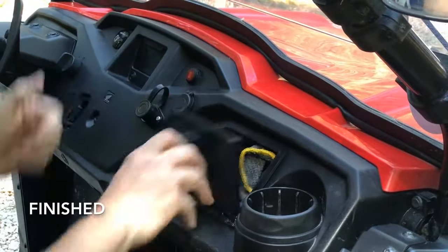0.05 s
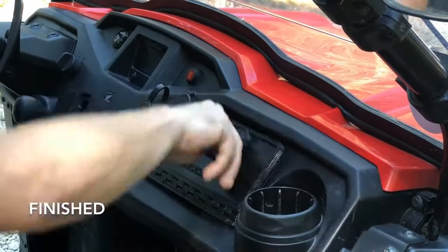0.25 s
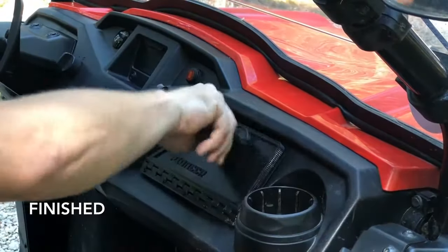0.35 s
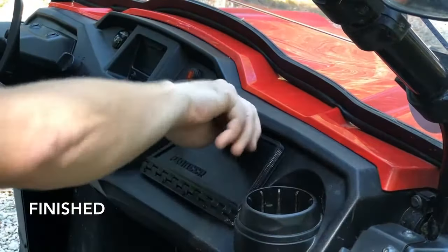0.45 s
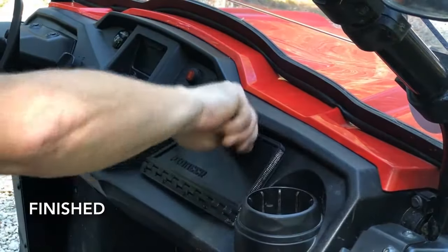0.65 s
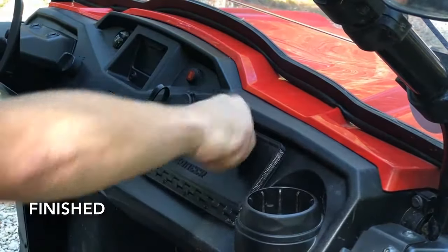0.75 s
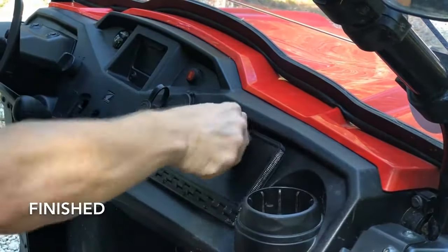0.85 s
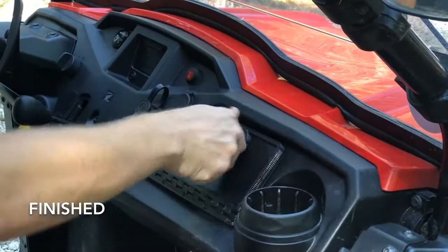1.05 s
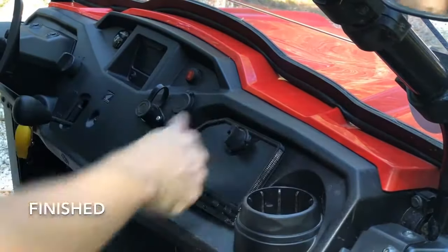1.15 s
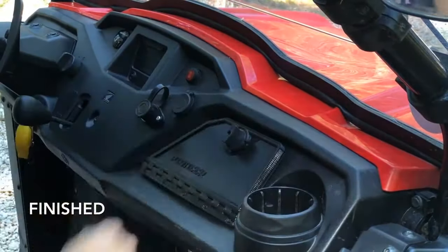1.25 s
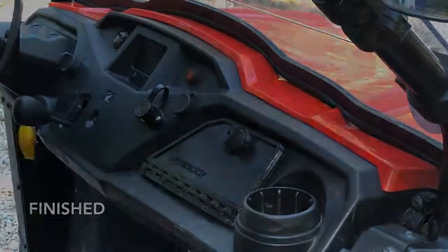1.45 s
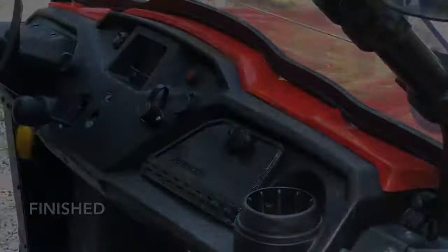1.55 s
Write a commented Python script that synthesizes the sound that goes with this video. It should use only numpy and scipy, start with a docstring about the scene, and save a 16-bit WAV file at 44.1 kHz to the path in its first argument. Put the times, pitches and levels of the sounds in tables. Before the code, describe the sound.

Close by in an open vehicle, a hard plastic lid is swung shut with a loud, rattling clack. Weaker bumps and latch ticks follow as a hand turns the knob, over quiet air and a faint insect hiss.

```python
"""Glove box lid shut outdoors

A hand swings a vehicle's plastic glove box lid shut: the blow rings its modes, a loud clack that
rattles out. Fingers rub and bump the lid and turn its knob, whose latch ticks over its teeth; a last
double knock. Insects hiss in a narrow high band over quiet open air."""
import sys
import numpy as np
from scipy import signal
from scipy.fft import rfft, irfft
from scipy.io import wavfile
from scipy.ndimage import uniform_filter1d

SR = 44100
rng = np.random.default_rng(int(sys.argv[2]) if len(sys.argv) > 2 else 0)


def file_out(sig):
    """Save sig as 16-bit WAV at sys.argv[1]."""
    # one column per channel
    cols = np.atleast_2d(sig).T
    # limit, then scale
    lim = np.clip(cols, -1, 1)
    pcm = np.round(lim * 32767).astype(np.int16)
    wavfile.write(sys.argv[1], SR, pcm)


N = 70560
BEND_DELAY_S = 0.003757  # bending waves at 1 kHz; lower ones arrive later


def undb(db):
    """dB to gain."""
    return 10 ** (np.asarray(db) / 20)


def log_interp(table, hz, col=1):
    """Table column on a log-frequency axis."""
    table = np.array(table)
    return np.interp(np.log(hz), np.log(table[:, 0]), table[:, col])


def fader(table, col=1):
    """Gain over time from a dB column."""
    table = np.array(table)
    return undb(np.interp(np.arange(N) / SR, table[:, 0], table[:, col]))


def shaped_noise(gain):
    """Unit-rms noise with spectrum gain(hz)."""
    hz = np.maximum(np.fft.rfftfreq(N, 1 / SR), 1)
    noise = irfft(rfft(rng.standard_normal(N)) * gain(hz), N)
    return noise / np.sqrt(np.mean(noise ** 2))


def table_noise(table):
    """Unit-rms noise from (f/Hz, level/dB) rows, silent outside them."""
    return shaped_noise(lambda hz: undb(log_interp(table, hz)) * (hz > table[0][0]) * (hz < table[-1][0]))


def wander(rate_hz):
    """Slewed random steps, spread near 1."""
    hold = int(SR / rate_hz)
    return uniform_filter1d(np.repeat(rng.standard_normal(N // hold + 1), hold), hold)[:N]


def burst(t, rise_s, t60_s):
    """Rise from t = 0, exponential decay."""
    t = np.maximum(t, 0)
    return (1 - np.exp(-t / rise_s)) * 10 ** (-3 * t / np.maximum(t60_s, .002))


def open_air():
    """Steady quiet air, a faint treble hiss and a narrow whirr."""
    air_spectrum = [(18, -42), (30, -1), (547, -8), (712, -19.5), (1380, -17.5), (3470, -18), (8300, -30.5),
                    (9470, -45), (15200, -37), (16500, -30)]  # f/Hz, level/dB
    hiss_level = [(0.0, -70), (0.128, -67), (0.284, -64.5), (0.614, -73), (1.01, -72), (1.14, -72.5),
                  (1.6, -92)]  # t/s, level/dB
    whirr_peaks = [(1240, 55, 0), (1370, 62, -0.5)]  # f/Hz, width/Hz, level/dB
    whirr_level = [(0, -80), (.4, -69.5), (.75, -71.5), (1, -70), (1.3, -74), (1.6, -81)]  # t/s, level/dB
    hiss = shaped_noise(lambda hz: (hz > 4000) * (hz / 10000) ** -.3)
    whirr = shaped_noise(lambda hz: np.sqrt(sum(
        undb(2 * db) / (1 + ((hz - f) / (width / 2)) ** 2) ** 2 for f, width, db in whirr_peaks)))
    air = undb(-67.5) * table_noise(air_spectrum)
    return air + fader(hiss_level) * hiss + fader(whirr_level) * whirr


def insects():
    """Throbbing hiss, mainly 7-9 kHz."""
    spectrum = [(3820, -30), (6500, -16), (6760, -16), (6990, -5.5), (7410, -2), (8410, -1), (8870, -9.5),
                (9010, -33), (9200, -27), (12000, -48), (20200, -120)]  # f/Hz, level/dB
    level = [(0, -68.5), (.5, -67.5), (1, -68.5), (1.3, -72.5), (1.6, -77.5)]  # t/s, level/dB
    throb = undb(1.8 * wander(50))
    return fader(level) * throb * table_noise(spectrum)


def hand_rub():
    """Skin drags and bumps unevenly over plastic."""
    levels = [(0, -60, -70.5), (.07, -66, -68), (.13, -53.5, -62), (.2, -55, -48.5), (.3, -42.5, -52.5),
              (.38, -56, -60), (.5, -62.5, -62.5), (.63, -58, -65), (.75, -64, -67), (.9, -57, -61),
              (1.02, -65, -65.5), (1.2, -62.5, -67), (1.3, -75, -69), (1.44, -81, -73.5), (1.6, -67.5, -76)]  # t/s, lows/dB, mids/dB
    low_spectrum = [(18, -29), (30, -7), (70, 3), (140, -2.5), (259, -7.5), (291, -6.5), (500, -19.5),
                    (650, -46), (1100, -120)]  # f/Hz, level/dB
    mid_spectrum = [(240, -28), (400, -3.5), (616, -3), (821, -3.5), (1230, -7), (1420, -10.5),
                    (2690, -16.5), (3940, -19), (7000, -34), (9100, -68), (15400, -120)]  # f/Hz, level/dB
    lows = fader(levels, col=1) * table_noise(low_spectrum) * undb(2.3 * wander(24.6))
    mids = fader(levels, col=2) * table_noise(mid_spectrum)
    return lows + mids * undb(1.37 * wander(40.4) + 2.8 * wander(300))


def knob_response():
    """Knob modes after one tap, unit energy."""
    modes = [(641, -5, 0.043), (1076, -8, 0.053), (1356, -7, .05), (1792, -8.5, 0.036), (2123, -4, 0.035),
             (2446, -3.5, 0.035), (2600, -3.5, 0.035), (2984, -2.5, 0.037), (3322, 0, 0.029),
             (3554, -7, 0.033)]  # f/Hz, level/dB, t60/s
    hz, db, t60_s = np.array(modes).T[:, :, None]
    t = np.arange(SR // 10) / SR
    tap = (undb(db) * burst(t, 0.00081, t60_s) * np.sin(2 * np.pi * hz * t)).sum(axis=0)
    return tap / np.sqrt(np.sum(tap ** 2))


def latch():
    """Each tooth lets go with a bright snap and a weaker rebound; a tap and a scrape ring the knob."""
    teeth = [(0.6467, -44, -55), (0.8058, -41, -52.5), (0.957, -43, -52.5), (0.9691, -44.5, -57.5),
             (0.9789, -51, -56), (0.9913, -46, -57), (1.0729, -42, -50.5), (1.0948, -44.5, -53),
             (1.1122, -45, -52.5), (1.1261, -46, -56), (1.2808, -44.5, -52.5), (1.3743, -47.5, -56.5),
             (1.5242, -48, -61), (1.5954, -55, -67)]  # t/s, relative snap level/dB, relative knob drive/dB
    snap_spectrum = [(2350, -35), (4000, -9.5), (6470, -8.5), (7020, -6.5), (7750, -11), (9380, -12.5),
                     (13800, -2), (16000, -8.5)]  # f/Hz, level/dB
    rise_s, rebound_s, rebound_db = .0015, .0062, -9
    t = np.arange(N) / SR

    def tick(s, t60_s):
        return burst(t - s, rise_s, t60_s) + undb(rebound_db) * burst(t - s - rebound_s, rise_s, t60_s)

    drive = sum(undb(db) * tick(s, t60_s=.035) for s, _, db in teeth) * rng.standard_normal(N)
    snap_env = np.zeros(N)
    for s, snap_db, knob_db in teeth:
        tail = undb(-17.5) * burst(t - s, rise_s=0.0029, t60_s=0.086)
        snap_env += undb(snap_db) * (tick(s, t60_s=.016) + tail)
        drive[int((s + .0006) * SR)] += undb(knob_db + 20.5)  # tap on top of the scrape
    snaps = snap_env * table_noise(snap_spectrum) * undb(1 + 1.8 * wander(2000))
    return snaps + undb(4) * signal.fftconvolve(drive, knob_response())[:N]


def lid_ring(level_db, weight, delay_s, t60_scale):
    """One blow on lid and box; low modes arrive later and swell over a cycle."""
    modes = [(123, 1, 0.12), (147.7, 1, 0.15), (198.1, -0.5, 0.12), (258.7, -3.5, 0.085),
             (317.6, -7.5, 0.088), (352, -5.5, 0.12), (409, -7.5, 0.11), (495, 4, 0.048), (627, -5, 0.042),
             (734.4, -9.5, 0.1), (842, -17, 0.096), (932.4, -3.5, 0.089), (1096, 2, 0.033),
             (1236, -1, 0.029), (1590, -6, 0.052), (1937, 3, 0.025), (2310, -3.5, 0.055), (3110, 1, 0.036),
             (4115, 5, 0.021), (5700, -1.5, 0.024), (8330, -1, 0.018), (10730, -9.5, 0.019)]  # f/Hz, level/dB, undamped t60/s
    hz, db, t60_s = np.array(modes).T[:, :, None]
    level_jitter, pitch_jitter = rng.standard_normal((2, len(modes), 1))
    age_s = np.arange(SR // 3) / SR - delay_s * np.sqrt(1000 / hz)
    polarity = (-1) ** np.arange(len(modes))[:, None]
    gain = undb(db + 3.2 * level_jitter) * weight(hz) * polarity
    env = burst(age_s, .5 / hz + 0.00027, t60_scale * t60_s)
    partials = gain * env * np.sin(2 * np.pi * hz * (1 + 0.0076 * pitch_jitter) * age_s)
    return undb(level_db) * partials.sum(axis=0) / np.sqrt(np.sum(gain ** 2))


def lid_blows():
    """The shutting blow rings every mode; bumps ring those near their contact pitch, and scuff."""
    bumps = [(.08, -66, 388, 1.2, -50), (.097, -56, 600, 0.85, -52), (0.114, -36, 147, 0.43, -50.5),
             (0.152, -36, 304, 0.39, -73), (.165, -38, 300, 0.29, -73), (.181, -28.5, 275, 0.33, -65),
             (.184, -41, 1100, .8, -65), (.193, -33, 1190, 0.45, -72), (0.248, -18, 160, 0.62, -47),
             (.259, -24, 1090, 0.86, -35), (.265, -18.5, 510, 1.3, -49), (.278, -27.5, 417, 1.34, -48.5),
             (.294, -31.5, 397, 0.82, -69), (.314, -29.5, 160, 0.34, -68), (.342, -35, 146, 0.25, -63),
             (0.353, -48, 3200, 0.26, -51), (.411, -54, 1200, 1.23, -54), (.436, -44, 1460, 0.74, -52),
             (.483, -42, 253, 0.39, -60), (0.492, -45.5, 510, 1.14, -57), (.539, -44.5, 800, 0.56, -76),
             (.555, -51.5, 1220, 0.54, -61), (.582, -55.5, 2600, 0.24, -54), (0.595, -40, 203, 0.49, -75),
             (.655, -51.5, 570, 0.54, -56), (0.674, -53, 1590, 0.14, -70), (.865, -39.5, 930, 0.44, -58),
             (0.886, -52, 119, 0.36, -62), (.9, -46, 613, 0.54, -67), (.912, -44, 1830, 0.43, -58),
             (0.957, -50.5, 201, 0.47, -70), (0.994, -43.5, 133, 0.22, -67), (1.172, -42.5, 1200, 1., -52),
             (1.183, -48, 600, 1.2, -77), (1.474, -69, 1980, 1., -59), (1.494, -35, 417, 0.77, -51),
             (1.512, -37.5, 250, 0.68, -66), (1.518, -36.5, 570, 0.77, -73), (1.53, -56, 305, 0.44, -55),
             (1.553, -51, 129, 0.22, -72), (1.577, -57, 905, 0.83, -72)]  # t/s, level/dB, contact f/Hz, spread/octaves, scuff/dB
    shut_s, shut_db = .2338, -9
    hand_damping = 0.68  # a hand on the lid shortens the ring
    out, scuff_env, t = np.zeros(N + SR), np.zeros(N), np.arange(N) / SR
    blows = [(shut_s, lid_ring(shut_db, np.ones_like, BEND_DELAY_S, t60_scale=1))]
    for s, db, hz, octaves, scuff_db in bumps:
        contact = lambda f: np.exp(-.5 * (np.log2(f / hz) / octaves) ** 2)
        blows.append((s, lid_ring(db, contact, delay_s=0.00027, t60_scale=hand_damping)))
        scuff_env += undb(scuff_db) * burst(t - s, rise_s=0.0015, t60_s=0.047)
    for s, blow in blows:
        out[int(s * SR):int(s * SR) + len(blow)] += blow
    return out[:N] + scuff_env * shaped_noise(lambda hz: (hz > 700) * hz ** -0.84)


def lid_slam():
    """Dense overtones of the shutting lid: third-octave noise, lows later, loose parts chattering."""
    crack_spectrum = [(350, -35), (600, -10), (1750, -5.5), (2010, -9), (3680, -7.5), (3990, -10.5),
                      (4910, -11.5), (10700, -25), (16000, -38)]  # f/Hz, level/dB
    decay = [(600, 0.15, -15, 0.25), (1470, 0.054, -13.5, 0.15), (3960, 0.032, -18, 0.13),
             (8700, 0.024, -6, 0.087), (15100, 0.073, -9, 0.1)]  # f/Hz, t60/s, relative tail level/dB, tail t60/s
    slam_s, gain_db = .2345, -22.5
    out, t = 0, np.arange(N) / SR
    for hz in 630 * 2 ** np.arange(0, 4.8, 1 / 3):
        age_s = t - slam_s - 0.87 * BEND_DELAY_S * np.sqrt(1000 / hz)
        t60_s, tail_db, tail_t60_s = (log_interp(decay, hz, col) for col in (1, 2, 3))
        env = burst(age_s, .001, t60_s) + undb(tail_db) * burst(age_s, 0.0037, tail_t60_s)
        band = shaped_noise(lambda f: np.exp(-(np.log2(f / hz) * 5) ** 2))
        chatter_db = 2.5 * wander(150)
        out += band * env * undb(log_interp(crack_spectrum, hz) + chatter_db) * np.sqrt(hz / 1000)
    return undb(gain_db) * out


def scene():
    """Mono sum of all sources."""
    return (lid_blows() + lid_slam() + latch() + hand_rub() + open_air() + insects())[None]


def record(dry):
    """45 Hz high-pass, steep 15.9 kHz low-pass."""
    low_cut = signal.sosfilt(signal.butter(3, 45, "high", fs=SR, output="sos"), dry)
    return signal.sosfilt(signal.ellip(10, .2, 70, 15900, fs=SR, output="sos"), low_cut)


dry = scene()
out = record(dry)
file_out(out)
```